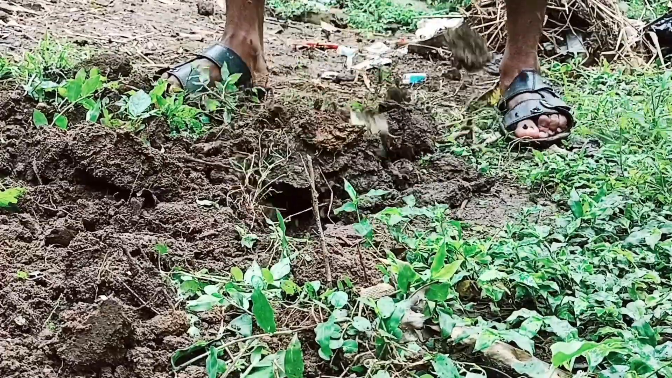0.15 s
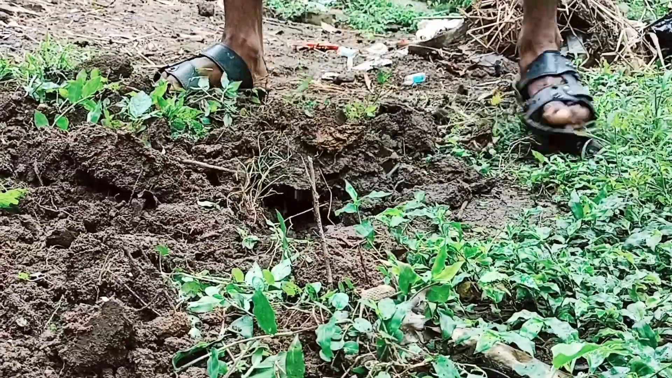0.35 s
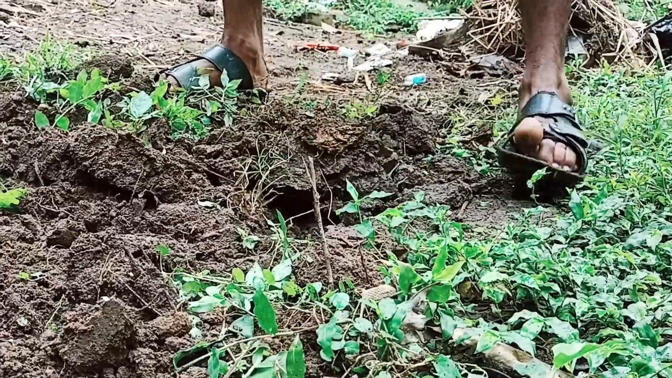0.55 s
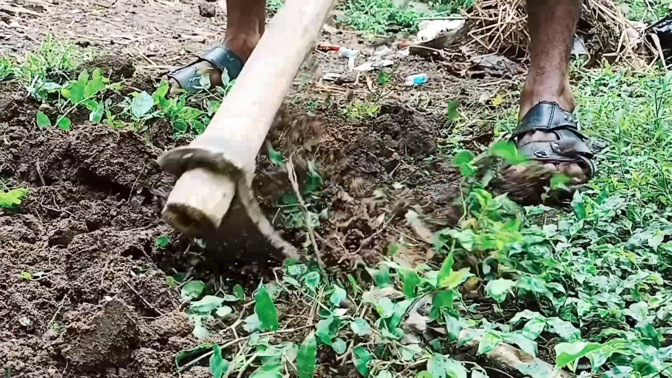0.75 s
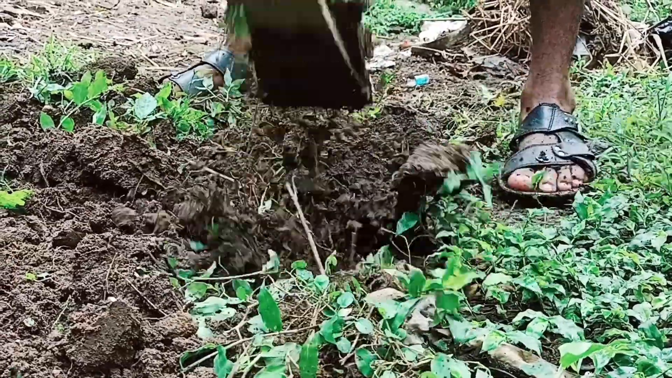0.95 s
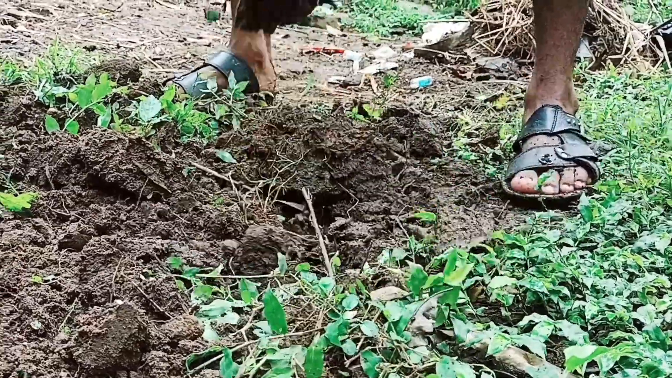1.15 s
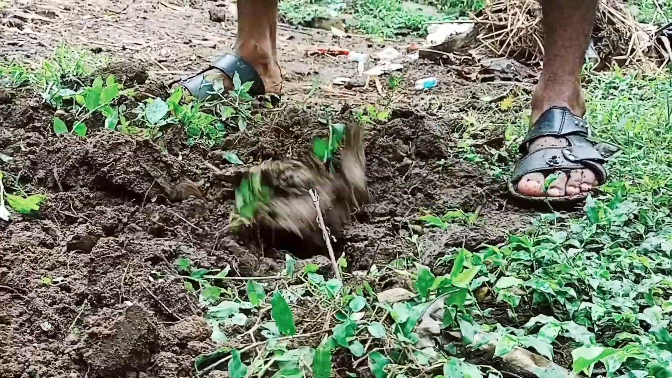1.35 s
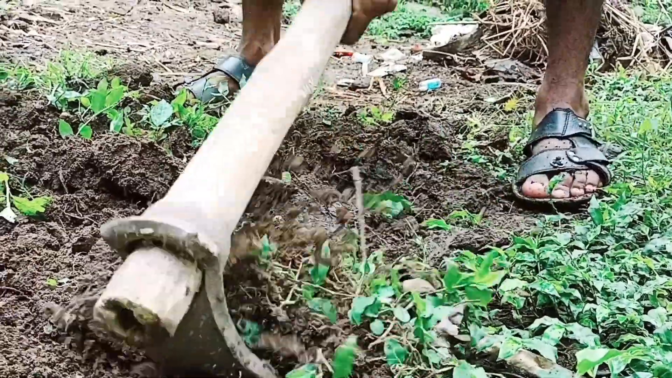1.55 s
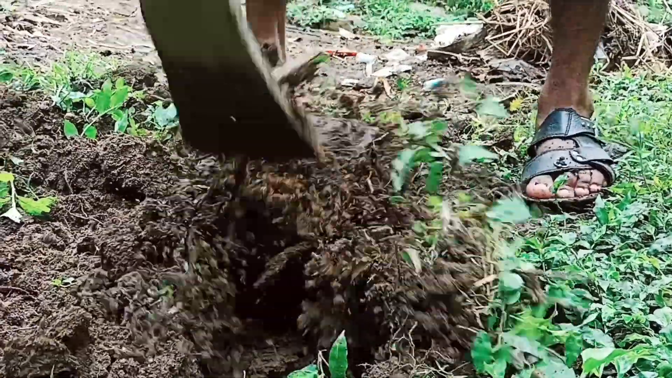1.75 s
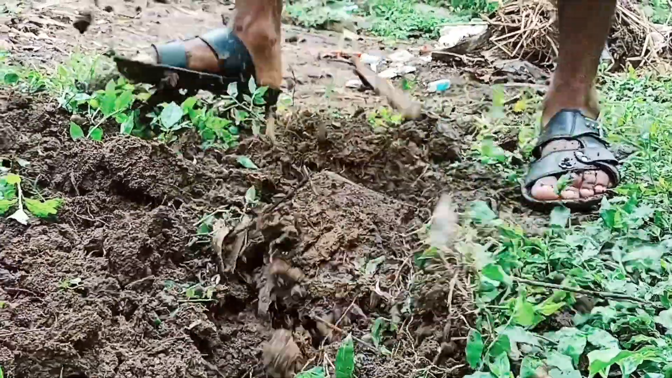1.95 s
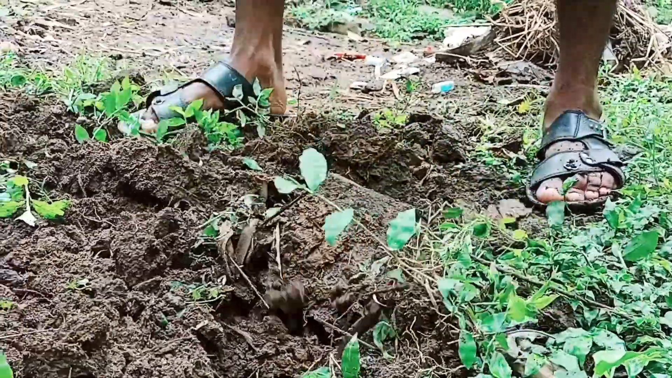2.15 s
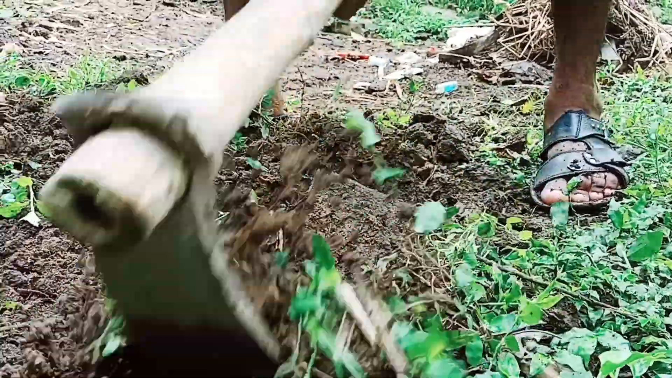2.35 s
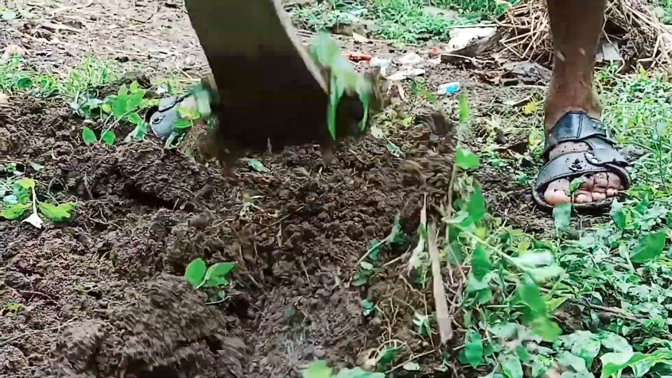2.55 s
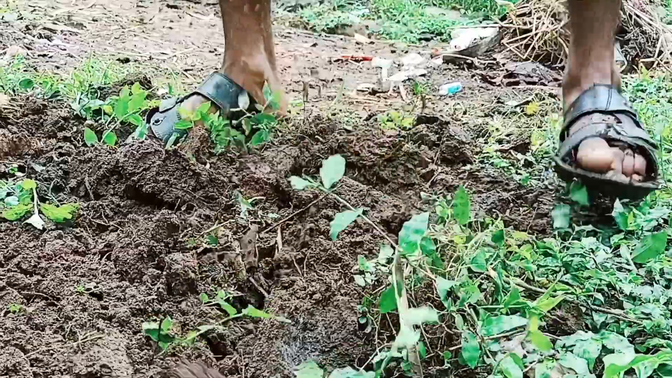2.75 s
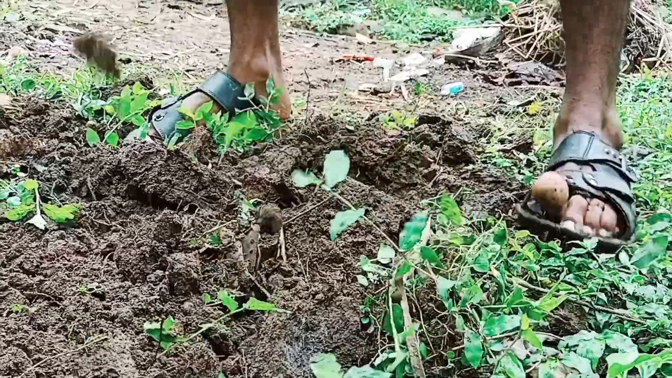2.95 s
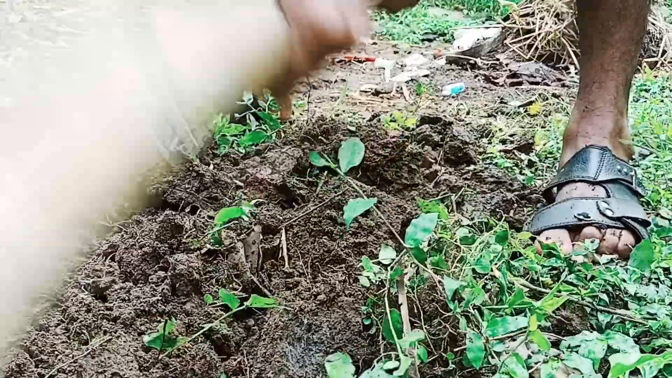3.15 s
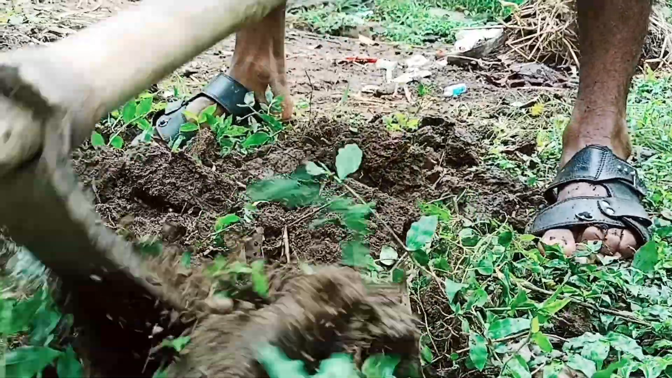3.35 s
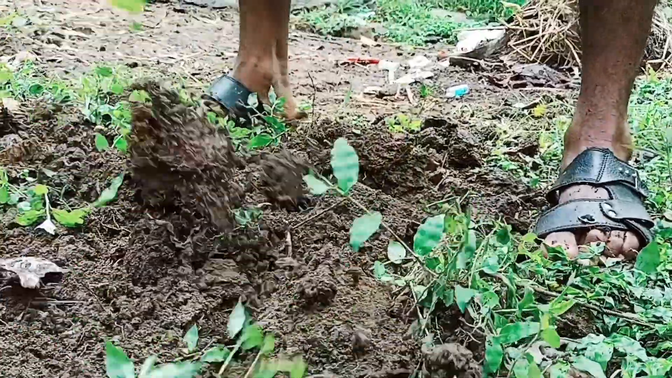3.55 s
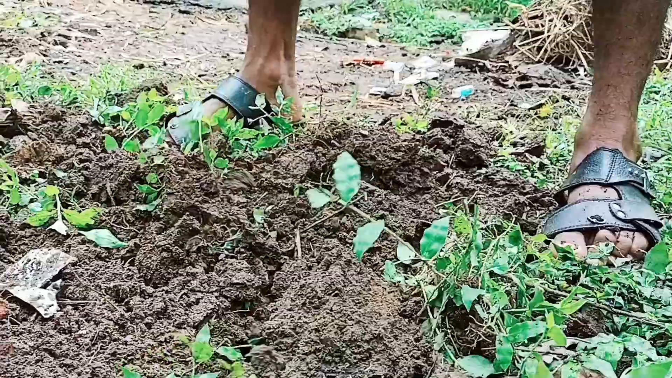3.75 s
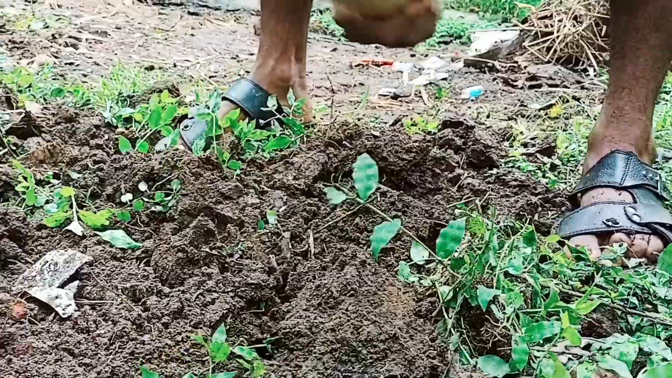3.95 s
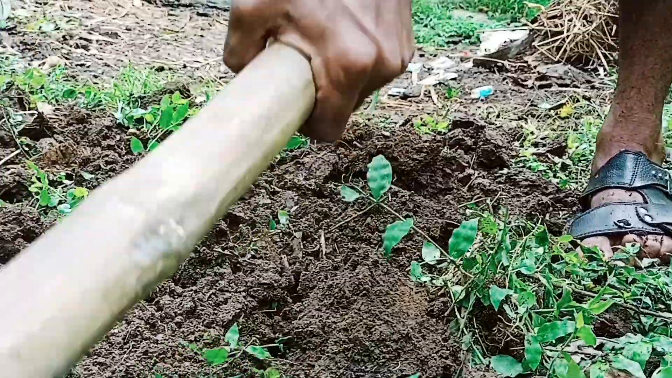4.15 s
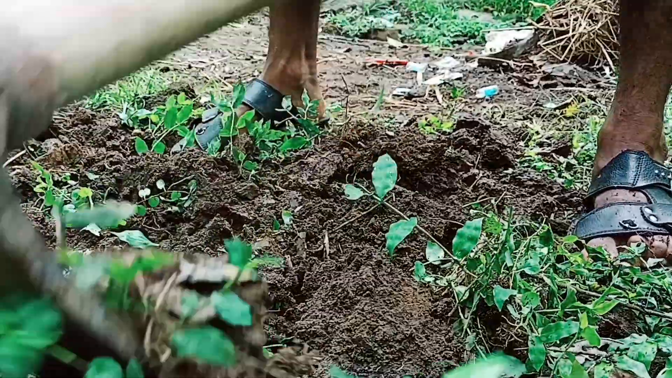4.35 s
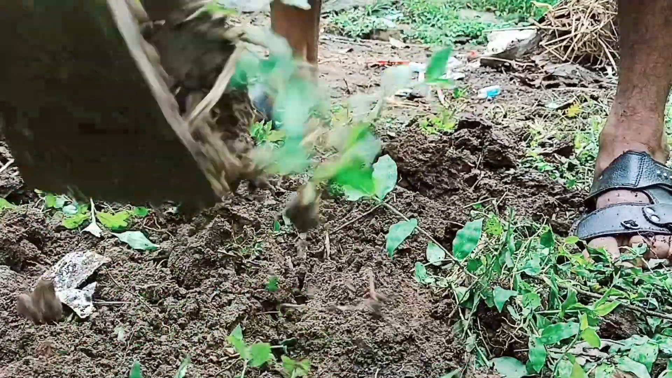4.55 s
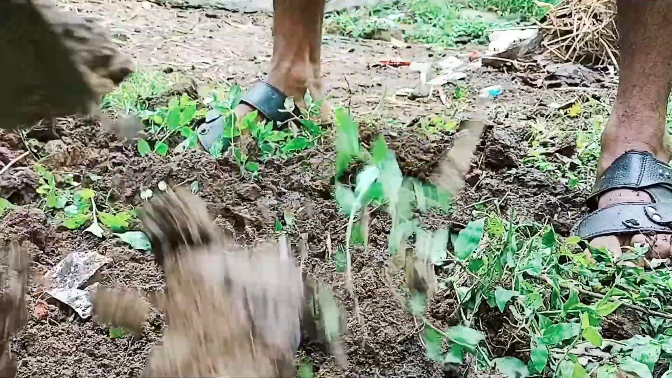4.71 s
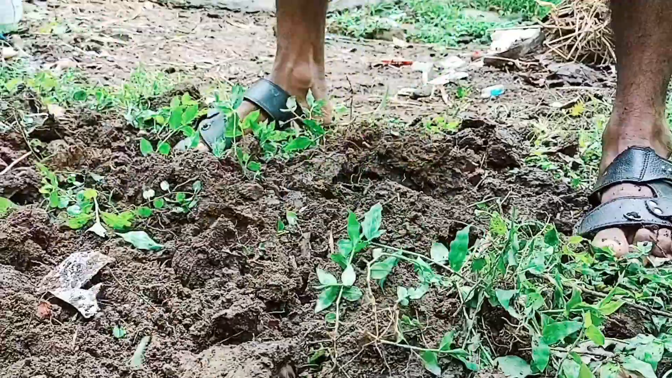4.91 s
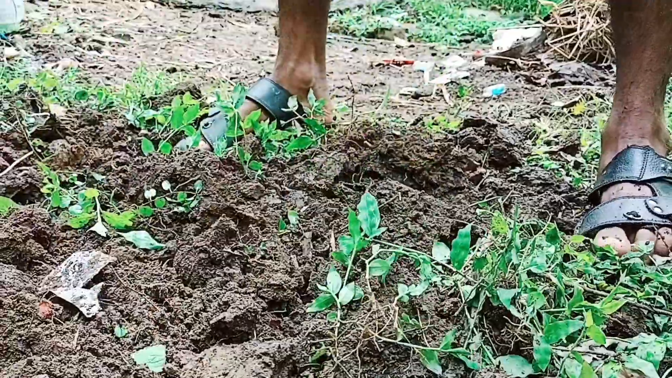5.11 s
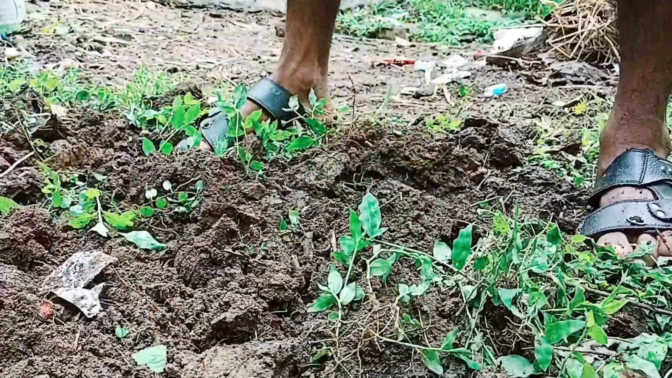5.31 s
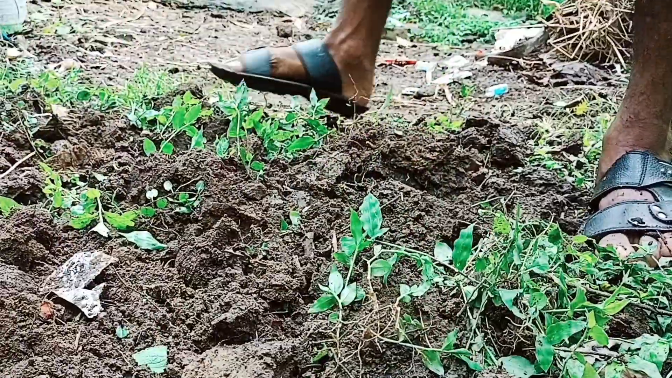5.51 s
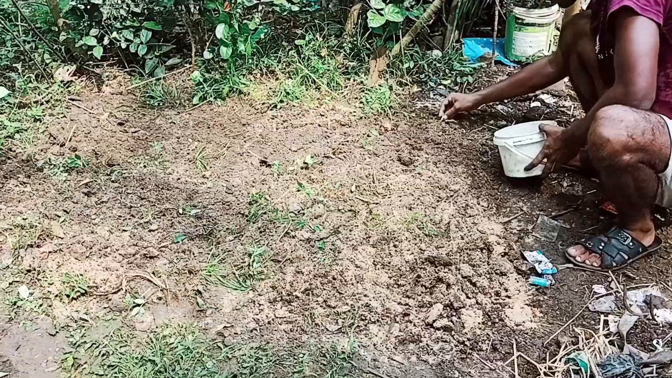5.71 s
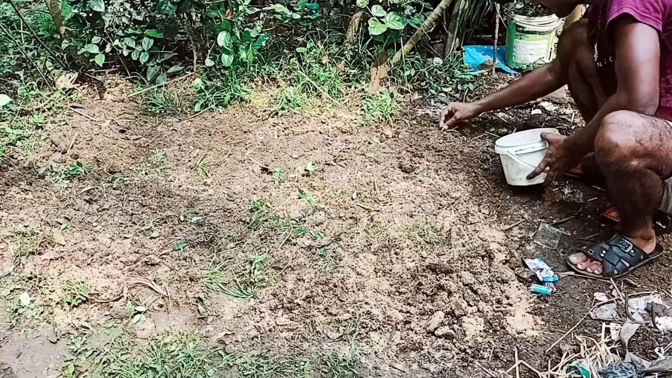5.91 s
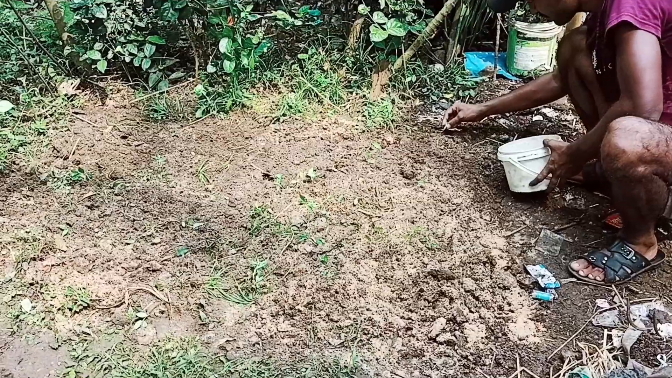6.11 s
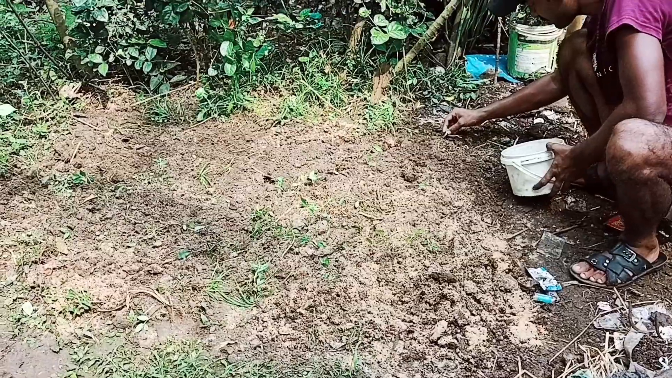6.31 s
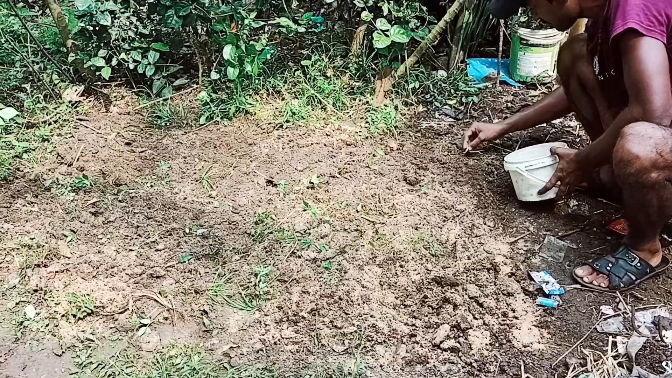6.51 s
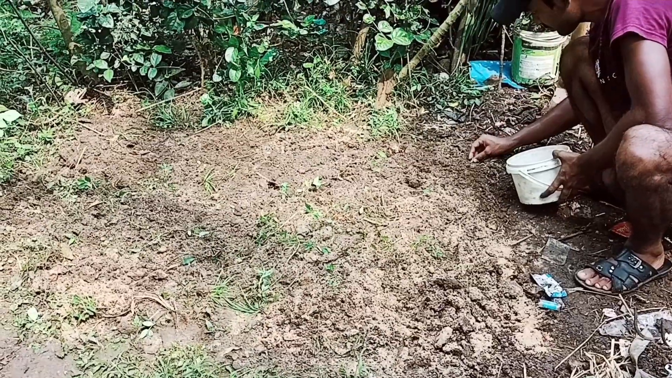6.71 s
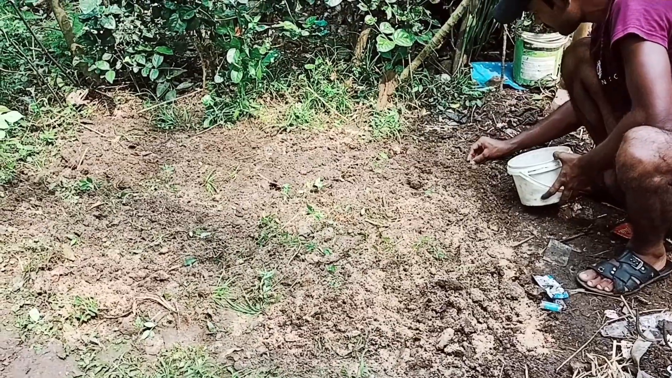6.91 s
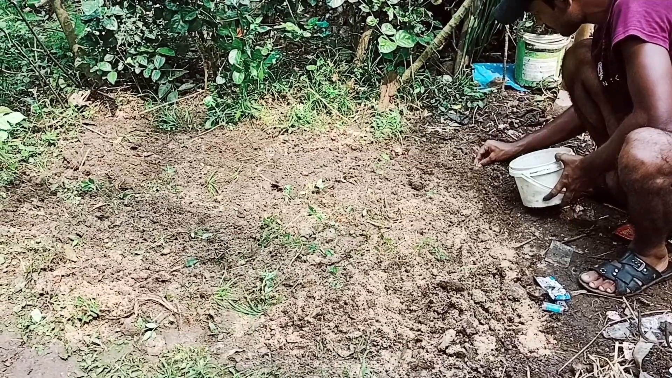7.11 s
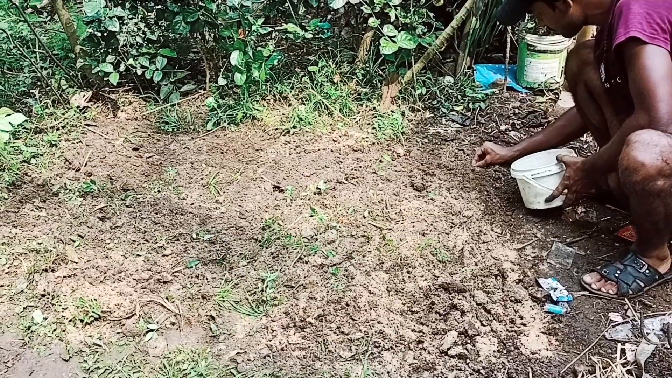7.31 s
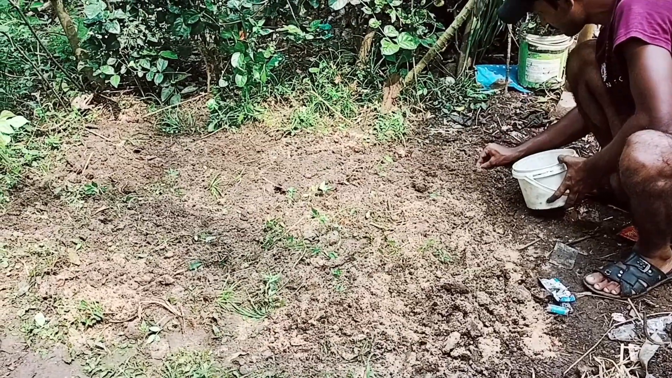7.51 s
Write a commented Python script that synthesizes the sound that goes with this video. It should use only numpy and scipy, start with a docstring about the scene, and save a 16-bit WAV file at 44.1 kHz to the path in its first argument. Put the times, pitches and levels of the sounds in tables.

```python
"""Hoe chopping weedy garden soil

Five chops: the blade shears stems, crunches through grit and packs soil to a thud, all as shaped, filtered grains.
Ringing noise bursts snap, click and tick; patter, rustle and scrape spill over low air, hiss and faint far hoots.
After a silent gap comes a quieter corner of the garden, where a bird chirps in runs of falling sine whistles."""
import sys
import numpy as np
from scipy import signal
from scipy.fft import rfft, irfft
from scipy.io import wavfile
from scipy.ndimage import uniform_filter1d

SR = 44100
rng = np.random.default_rng(int(sys.argv[2]) if len(sys.argv) > 2 else 0)


def unload_audio(sound):
    """Save the sound as a 16-bit wav file, at the path given as the first command line argument."""
    columns = np.transpose(np.atleast_2d(sound))
    # keep every value between -1 and 1, then stretch to whole-number steps
    steps = np.round(np.clip(columns, -1, 1) * 32767)
    wavfile.write(sys.argv[1], SR, steps.astype(np.int16))


N = 333837
T = np.arange(N) / SR
HZ = np.fft.rfftfreq(N, 1 / SR)
DIGGING_ENDS_S, CORNER_STARTS_S = 5.606, 6.26


def gain_of(db):
    """Decibels to amplitude."""
    return 10 ** (np.asarray(db) / 20)


def evened(x):
    """Scales to rms 1."""
    return x / np.sqrt(np.mean(x ** 2) + 1e-20)


def level(rows):
    """Gain interpolated in dB through rows of (time_s, level_db)."""
    return gain_of(np.interp(T, *np.transpose(rows)))


def add(mix, start_s, sound):
    """Mixes a sound in place, cut off at the end of the mix."""
    part = mix[round(start_s * SR):][:len(sound)]
    part += sound[:len(part)]


def colour(x, spectrum, modes=()):
    """Minimum-phase filter from a spectrum plus resonant peaks; output rms 1."""
    f, db = np.transpose(spectrum)
    db = np.interp(np.log(HZ + 1), np.log(f), db)
    for hz, width_hz, peak_db in modes:
        db = db + peak_db / (1 + (2 * (HZ - hz) / width_hz) ** 2)
    log_gain = np.log(gain_of(np.interp(np.linspace(0, SR / 2, 2049), HZ, db)))
    circle = np.concatenate([log_gain, log_gain[-2:0:-1]])
    # the Hilbert transform of log gain gives the causal phase
    response = np.exp(np.conj(signal.hilbert(circle)))[:len(log_gain)]
    taps = irfft(response)
    return evened(signal.oaconvolve(x, taps)[:N])


def grains(per_s, spread_db):
    """Tiny fractures: impulses of random time, sign and size, exponentially spread in dB; rms 1."""
    size = gain_of(spread_db * np.minimum(rng.exponential(1, N), 4))
    sign = rng.choice([-1, 1], N)
    struck = rng.random(N) < per_s / SR
    return evened(size * sign * struck)


def flutter(corner_hz, depth_rms_db):
    """Gain that wanders at random in dB, as low-passed noise."""
    smoothed = rfft(rng.standard_normal(N)) / (1 + (HZ / corner_hz) ** 4)
    return gain_of(depth_rms_db * evened(irfft(smoothed, N)))


def swell(peak_s, rise_s, fall_s):
    """Rounded peak of gain 1; about 6 dB down at rise_s before and fall_s after."""
    t = T - peak_s
    early = np.minimum(t, 0) / rise_s
    late = np.maximum(t, 0) / fall_s
    exponent = 1.5 - np.hypot(.5, early) - np.hypot(1, late * 1.43)
    return np.exp(np.maximum(exponent, -40))


def yard(x, t60_s, wet_db):
    """Adds sparse decaying echoes, as scattered by ground, walls and bushes."""
    t = np.arange(SR // 2) / SR
    sparse = rng.standard_normal(len(t)) * (rng.random(len(t)) < .1)
    tail = sparse * gain_of(-60 * t / t60_s) * (t > .006)
    return x + gain_of(wet_db) * signal.oaconvolve(x, tail / np.linalg.norm(tail))[:N]


def ticks(rows, width_hz, decay_s, crack):
    """A break or landing: a brief noise burst rings at the pitch of the piece; rows are (start_s, peak_db, pitch_hz)."""
    out, t = np.zeros(N), np.arange(SR // 30) / SR
    for start_s, peak_db, pitch_hz in rows:
        burst = rng.standard_normal(len(t)) * np.exp(-t / decay_s)
        piece = t * np.exp(-np.pi * width_hz * t) * np.cos(2 * np.pi * pitch_hz * t)
        ring = evened(signal.fftconvolve(burst, piece)[:len(t)])
        tick = ring + crack * evened(np.diff(burst, prepend=0))
        add(out, start_s, gain_of(peak_db) * tick / abs(tick).max())
    return out


def air(spectrum, levels, patchy_rms_db=2.5):
    """Outdoor noise in which narrow patches of pitch swell and fade."""
    z = signal.stft(rng.standard_normal(N), nperseg=2048, noverlap=1536)[2]
    patches = uniform_filter1d(rng.standard_normal(z.shape), size=3, axis=0)  # across pitch
    patches = uniform_filter1d(patches, size=9, axis=1)  # across time
    patchy = z * gain_of(patchy_rms_db * evened(patches))
    noise = signal.istft(patchy, nperseg=2048, noverlap=1536)[1][:N]
    return colour(noise, spectrum) * level(levels) * flutter(corner_hz=9, depth_rms_db=1.0)


# spectrum of distant rumble: freq_hz, relative_db
RUMBLE_SPECTRUM = [(15, -52.5), (25, -34), (45, -14), (68, -3.5), (85, 1), (125, -1.5), (170, 1),
                   (210, -6.5), (258, -6), (350, -15), (500, -16.5), (620, -21.5), (800, -22), (1100, -39)]
# its level: time_s, level_db
RUMBLE_LEVEL = [(0, -43.5), (2.6, -45.5), (4.4, -43), (5.6, -45.5)]


def rumble():
    """Distant low rumble under the digging: patchy filtered noise."""
    return air(RUMBLE_SPECTRUM, RUMBLE_LEVEL)


# spectrum of the air in the quiet corner: freq_hz, relative_db
GARDEN_SPECTRUM = [(20, -20), (35, -21), (62, 3), (85, 1), (170, -0.5), (230, -9), (420, -11), (750, -17.5),
                   (1100, -22.5), (2900, -22), (5500, -26.5), (7000, -26.5), (10400, -40), (14000, -39),
                   (16000, -40)]
# its level: time_s, level_db
GARDEN_LEVEL = [(6.26, -65.5), (6.64, -64), (6.70, -50.5), (7.57, -50.5)]


def garden():
    """Air of the quiet corner: patchy filtered noise that soon grows louder."""
    return air(GARDEN_SPECTRUM, GARDEN_LEVEL)


# spectrum of faint outdoor hiss: freq_hz, relative_db
HISS_SPECTRUM = [(100, -29.5), (600, -0.5), (1200, -7.5), (2500, -6.5), (7000, -10), (10000, -23),
                 (15000, -18.5)]


def hiss(level_db=-59.5):
    """Steady filtered noise under the digging."""
    return gain_of(level_db) * colour(rng.standard_normal(N), HISS_SPECTRUM)


# far hoots: start_s, length_s, pitch_hz, peak_db
HOOT_CALLS = [(3.40, 0.15, 490, -49), (3.55, 0.11, 509, -43), (3.87, 0.085, 494, -47.5),
              (4.655, 0.069, 522, -43.5), (4.71, 0.039, 489, -36)]


def hoots(waver=.006):
    """Soft far calls: nearly pure tones; waver is the rms share of pitch."""
    out = np.zeros(N)
    for start_s, length_s, pitch_hz, peak_db in HOOT_CALLS:
        window = signal.windows.hann(int(length_s * SR))
        drift = evened(uniform_filter1d(rng.standard_normal(SR), size=400))[:len(window)]
        turns = np.cumsum(pitch_hz * (1 + waver * drift)) / SR
        add(out, start_s, gain_of(peak_db) * window * np.sin(2 * np.pi * turns))
    return yard(out, t60_s=0.55, wet_db=-6)


# runs of syllables: start_s, onset_spacing_s, syllable_s, first_pitch_hz, last_pitch_hz,
# fall_share (of pitch, within a syllable), peak_db
BIRD_RUNS = [(6.658, .009, 0.0143, 2270, 2220, 0.3, -45), (7.09, .016, 0.024, 4170, 3780, .07, -59),
             (7.164, 0.016, .025, 3040, 2570, .06, -58)]


def bird(count=5, ends_db=-4):
    """Runs of short falling whistles, loudest mid-run, that echo among the trees."""
    out = np.zeros(N)
    for start_s, spacing_s, syllable_s, first_hz, last_hz, fall_share, peak_db in BIRD_RUNS:
        u = np.linspace(0, 1, int(syllable_s * SR))
        for k, pitch_hz in enumerate(np.linspace(first_hz, last_hz, count)):
            turns = rng.random() + np.cumsum(pitch_hz * (1 + fall_share * (.5 - u))) / SR
            from_middle = abs(2 * k / (count - 1) - 1)
            whistle = np.sin(np.pi * u) ** 2 * np.sin(2 * np.pi * turns)
            add(out, start_s + k * spacing_s, gain_of(peak_db + ends_db * from_middle) * whistle)
    return yard(out, t60_s=0.6, wet_db=-1)


# sandals and blade scuffing weeds and dry grit: peak_s, half_s, grit_db, leaves_db, crumbs_db
# (leaves and crumbs are trimmed in crumbs())
SCUFF_MOVES = [(0.214, .008, -56, -38.5, -39.5), (0.316, 0.015, -45, -36.5, -38),
               (0.427, 0.015, -46.5, -38.5, -44), (0.52, .06, -53.5, -52, -52),
               (0.82, .018, -37.5, -37, -32), (1.3, .025, -52, -44.5, -45), (2.67, .02, -60, -44.5, -43.5),
               (2.822, 0.033, -50, -40.5, -43.5), (2.977, 0.033, -64, -47, -47),
               (3.076, 0.036, -62, -45.5, -47), (3.636, .04, -50.5, -44, -60), (3.83, .06, -52, -49, -62.5),
               (4.402, .015, -55, -39, -38), (4.75, .028, -51.5, -41, -40.5), (5.376, .03, -60, -51.5, -54)]
# spectrum of a scuff: freq_hz, relative_db
SCUFF_SPECTRUM = [(200, -27), (1200, -8), (2300, -4.5), (3200, -0.5), (4300, -6), (7000, -18.5),
                  (14000, -29)]


def scuffs():
    """Dry grit rolls under a sole or the back of the blade: swelling grains."""
    push = sum(gain_of(grit_db) * swell(peak_s, half_s, half_s)
               for peak_s, half_s, grit_db, _, _ in SCUFF_MOVES)
    return push * colour(grains(per_s=3200, spread_db=3.5), SCUFF_SPECTRUM)


# spilling soil: start_s, rise_s, hold_s, leaves_db, crumbs_db, scrape_db (trimmed in crumbs())
SOIL_SPILLS = [(0.0, .04, 0.16, -45.5, -48, -53), (0.65, .02, 0.32, -42, -42.5, -53),
               (1.45, .12, 0.25, -46.5, -45.5, -65.5), (2.24, .02, 0.25, -46.5, -45.5, -62),
               (3.14, .02, .17, -39, -38.5, -51.5), (3.98, .24, 0.09, -37.5, -40, -51),
               (4.68, .05, 0.24, -47, -55, -54.5)]
# trodden bed, never quite still: leaves_db, crumbs_db, scrape_db (trimmed in crumbs())
REST_LEVELS = (-58.5, -64.5, -61)


def stir(settle_db_per_s=42.5):
    """Gains of leaves, crumbs and scrape: spills rise, hold and settle, scuffs swell; powers add."""
    power = gain_of(REST_LEVELS)[:, None] ** 2 * np.ones(N)
    for start_s, rise_s, hold_s, *levels_db in SOIL_SPILLS:
        rise = np.sqrt(np.clip((T - start_s) / rise_s, 0, 1))
        settling_s = np.maximum(T - start_s - rise_s - hold_s, 0)
        shape = rise * gain_of(-settle_db_per_s * settling_s)
        power += np.outer(gain_of(levels_db), shape) ** 2
    for peak_s, half_s, _, *levels_db in SCUFF_MOVES:
        power[:2] += np.outer(gain_of(levels_db), swell(peak_s, half_s, half_s)) ** 2
    return np.sqrt(power)


# spectra of fine soil, leaves and scrape: freq_hz, relative_db
CRUMB_SPECTRUM = [(2000, -37.5), (5000, -18), (7200, -4.5), (8500, -3.5), (10500, -7.5), (12000, -3),
                  (14000, 1.5), (15500, -1.5)]
LEAF_SPECTRUM = [(600, -26), (2000, -14), (3000, -8.5), (4000, -2.5), (5200, -1.5), (6000, 1.5), (7200, 3),
                 (8200, -5), (10000, -19.5)]
SCRAPE_SPECTRUM = [(100, -16.5), (450, -2), (750, 1.5), (1050, -3), (1500, -3), (2400, -4), (3300, 0),
                   (5000, -10), (10000, -40.5)]
# steady narrow peaks in the scrape's colour: freq_hz, width_hz, peak_db
SCRAPE_MODES = [(500, 130, 8), (1230, 99, 5.5), (1787, 180, 8), (2860, 150, 5.5), (3870, 220, 11.5)]


def crumbs(fine_trim_db=1.87, leaves_trim_db=-0.82, scrape_trim_db=2.5, near_db=-6):
    """Fine soil patters in clumps and leaves rustle, over the duller scrape of blade and sandals."""
    leaves, fine, drag = stir()
    clumps = flutter(corner_hz=61, depth_rms_db=0.86) * flutter(corner_hz=11, depth_rms_db=1.6)
    near = gain_of(near_db) * grains(per_s=140, spread_db=1.5)  # larger crumbs, shared by all three
    soil = colour(grains(per_s=9000, spread_db=2.0) + near, CRUMB_SPECTRUM)
    foliage = colour(grains(per_s=6000, spread_db=1.0) + near, LEAF_SPECTRUM)
    dragging = colour(grains(per_s=4000, spread_db=2.5) + near, SCRAPE_SPECTRUM, SCRAPE_MODES)
    patter = gain_of(fine_trim_db) * fine * soil
    rustle = gain_of(leaves_trim_db) * leaves * foliage
    scrape = gain_of(scrape_trim_db) * drag * dragging
    return clumps * (patter + rustle + scrape)


def pebbles(count=150, over_db=8, spread_db=3.0, low_hz=2600, high_hz=12000):
    """Small stones and twigs tick at random times and pitches, louder where more is spilling."""
    rustling = stir()[0]
    when, size, pitch = rng.random((count, 3)).T
    start_s = when * DIGGING_ENDS_S
    rustling_db = 20 * np.log10(rustling[(start_s * SR).astype(int)])
    peak_db = rustling_db + over_db - spread_db * np.log(np.maximum(size, .05))
    pitch_hz = low_hz * (high_hz / low_hz) ** pitch
    return ticks(zip(start_s, peak_db, pitch_hz), width_hz=2700, decay_s=.0004, crack=.35)


# lumps of earth landing, first piece of each: start_s, peak_db, pitch_hz
LUMP_LANDINGS = [(1.268, -34.5, 842), (1.565, -38, 650), (4.108, -33, 565), (4.137, -31, 630),
                 (4.257, -33.5, 577)]


def lumps(count=3, mean_gap_s=0.014, step_db=-3, step_pitch_ratio_max=1.7):
    """A lump lands and sheds pieces at uneven gaps, ever softer and pitched above the first."""
    rows = []
    for start_s, peak_db, pitch_hz in LUMP_LANDINGS:
        for k, (gap, size) in enumerate(rng.random((count, 2))):
            rows.append((start_s, peak_db + k * step_db, pitch_hz * step_pitch_ratio_max ** (k * size)))
            start_s += mean_gap_s * (.5 + gap)
    return ticks(rows, width_hz=830, decay_s=0.0048, crack=.15)


# hard grit landing or trodden on: start_s, peak_db, pitch_hz
GRIT_CLICKS = [(0.404, -23.5, 7000), (0.9462, -18, 14600), (2.0403, -25, 7260), (2.8185, -20.5, 7260),
               (3.5548, -19.5, 12500), (3.7554, -28, 12500), (4.169, -20, 2600), (4.1949, -10.5, 15100),
               (4.2570, -10.5, 5900), (4.3824, -19, 5950)]


def grit_clicks():
    """Hard bits click: very short, broadly resonant bursts."""
    return ticks(GRIT_CLICKS, width_hz=4200, decay_s=0.00038, crack=0.8)


# stems and roots snapping: start_s, peak_db, pitch_hz
STEM_SNAPS = [(0.5834, -28, 6200), (0.5886, -15.5, 6100), (0.6307, -9, 5200), (0.6412, -8, 14000),
              (1.094, -25, 6300), (1.4457, -8, 4600), (2.2145, -18, 7000), (3.1163, -21, 6500),
              (3.1245, -18.5, 6300), (3.9489, -18, 6300), (3.9635, -10, 7600), (3.9775, -4, 6100),
              (4.0256, -24, 5900)]


def snaps():
    """Stems and roots break: short bursts ringing at their own pitch."""
    return ticks(STEM_SNAPS, width_hz=1200, decay_s=0.00078, crack=.2)


# clod shoved, then slumping: slump_s, slump_db, slump_pitch_hz, shove_db, shove_pitch_hz
CLOD_SLUMPS = [(0.658, -23.5, 110, -24.5, 200.1), (1.462, -29, 88, -15.5, 205),
               (2.261, -17.5, 114, -24.5, 200), (3.148, -23.5, 86.6, -20.5, 265),
               (3.992, -20.5, 95, -22, 265)]


def slumps(width_cycles=0.8, shove_lead_s=.014):
    """A heavy clod gives two soft pulses of a couple of cycles: shoved by the blade, then a lower slump."""
    out = np.zeros(N)
    for slump_s, slump_db, slump_hz, shove_db, shove_hz in CLOD_SLUMPS:
        shove = (slump_s - shove_lead_s, shove_db, shove_hz)
        slump = (slump_s, slump_db, slump_hz)
        for centre_s, peak_db, pitch_hz in (shove, slump):
            turns = np.arange(-SR // 25, SR // 25) * pitch_hz / SR
            pulse = np.exp(-(turns / width_cycles) ** 2) * np.cos(2 * np.pi * turns)
            add(out, centre_s - len(turns) / SR / 2, gain_of(peak_db) * pulse)
    return out


# blows: strike_s, crunch_db, knock_db, thud_db, rise_s, fall_s, weeds_lead_s, weeds_db, hollow_hz
BLOWS = [(0.642, -15.5, -18.5, -23.5, 0.004, 0.015, 0.041, -35.5, 1170),
         (1.45, -12, -19.5, -22.5, 0.0033, 0.011, 0.0089, -47.5, 880),
         (2.236, -11.5, -20.5, -22.5, 0.0055, 0.0095, 0.025, -26.5, 460),
         (3.135, -14, -23.5, -20.5, 0.0035, 0.014, 0.018, -35, 480),
         (3.975, -11.5, -20.5, -23.5, 0.0053, 0.011, .054, -34, 310)]
# resonances of the steel blade, damped by soil: freq_hz, width_hz, peak_db
BLADE_MODES = [(566.6, 140, 3), (900, 80, 2), (1219, 100, 7.5), (1838, 41, 9.5), (3090, 70, 7),
               (4084, 280, 5.5), (4700, 110, 1), (5750, 47, 1.5), (6210, 93, 11.5), (7000, 90, 4.5)]
# spectra of grit, packing soil and thud: freq_hz, relative_db
CRUNCH_SPECTRUM = [(40, -50), (300, -28), (1200, -7), (2200, -11), (3500, -5.5), (5800, 0.5), (7500, -2),
                   (10500, -11.5), (14500, -5), (16000, -5)]
KNOCK_SPECTRUM = [(30, -45.5), (80, -14.5), (250, -6), (550, -2.5), (900, -3), (1400, -11.5), (2500, -9.5),
                  (6000, -28)]
THUD_SPECTRUM = [(25, -29.5), (55, -12), (85, -3), (200, 3.5), (280, -3), (500, -22), (2000, -60)]


def chops(hollow_width_hz=120, hollow_db=6):
    """The blade shears weeds, crushes grit, then packs the soil beneath it: ever lower sounds."""
    weeds, crunch, soil, thud = np.zeros((4, N))
    packing = grains(per_s=3300, spread_db=2.33)
    for strike_s, crunch_db, knock_db, thud_db, rise_s, fall_s, lead_s, weeds_db, hollow_hz in BLOWS:
        weeds += gain_of(weeds_db) * (T > strike_s - lead_s) * (T < strike_s)
        crunch += gain_of(crunch_db) * swell(strike_s, rise_s, fall_s)
        thud += gain_of(thud_db) * swell(strike_s + 0.0025, 0.0027, 0.013)
        hollow = (hollow_hz, hollow_width_hz, hollow_db)  # each cut has its own note
        cut = colour(packing, KNOCK_SPECTRUM, BLADE_MODES + [hollow])
        soil += gain_of(knock_db) * cut * swell(strike_s + 0.0033, 0.006, fall_s * 0.72)
    for slump_s, slump_db, *_ in CLOD_SLUMPS:  # a slumping clod grinds more grit
        crunch += gain_of(slump_db - 8) * swell(slump_s, 0.0017, 0.0043)
    grit = (weeds + crunch) * colour(grains(per_s=9000, spread_db=3.0), CRUNCH_SPECTRUM, BLADE_MODES)
    ground = thud * colour(grains(per_s=1800, spread_db=-0.74), THUD_SPECTRUM)
    stick_slip = flutter(corner_hz=310, depth_rms_db=2.0)  # the edge sticks and slips
    return grit * stick_slip + soil + ground


def scene():
    """The digging, a silent gap, then the quiet corner."""
    hits = chops() + slumps() + snaps() + grit_clicks() + lumps() + pebbles()
    hoe = yard(hits, t60_s=0.41, wet_db=-20.5)
    digging = hoe + crumbs() + scuffs() + hoots() + rumble() + hiss()
    corner = garden() + bird()
    return (digging * (T < DIGGING_ENDS_S) + corner * (T > CORNER_STARTS_S))[None]


def record(dry, low_cut_hz=45, high_cut_hz=15700):
    """Rounds off the highest peaks, drops the deepest bass and limits the band."""
    rounded = np.tanh(dry)
    heard = signal.sosfilt(signal.butter(2, low_cut_hz, "highpass", fs=SR, output="sos"), rounded)
    band = signal.firwin(401, high_cut_hz, window=("kaiser", 8), fs=SR)
    return signal.oaconvolve(heard, band[None], "same")


dry = scene()
out = record(dry)
unload_audio(out)
```